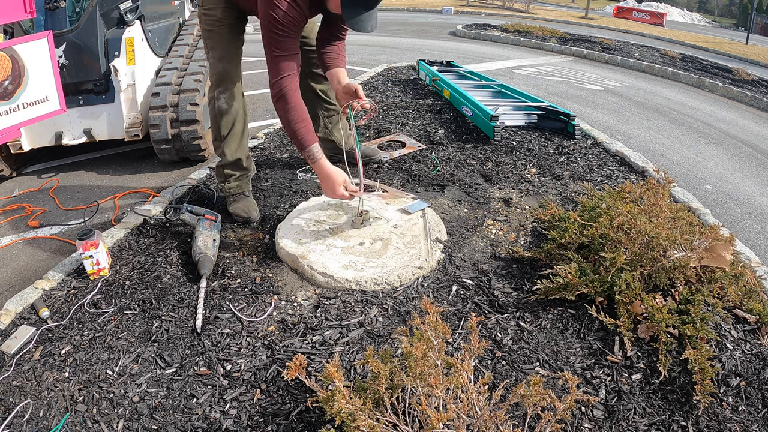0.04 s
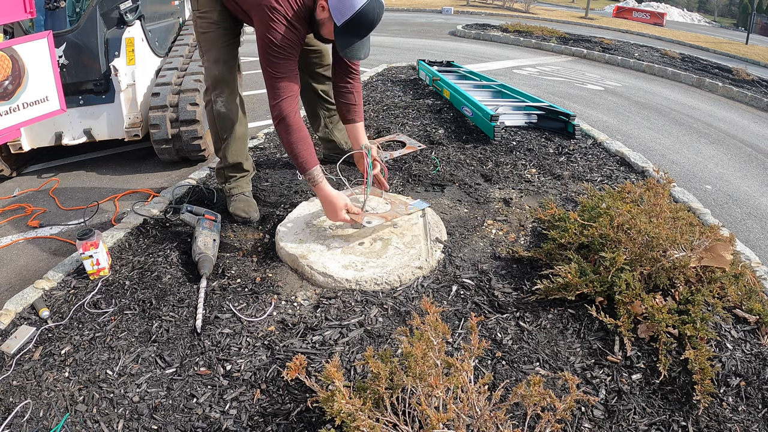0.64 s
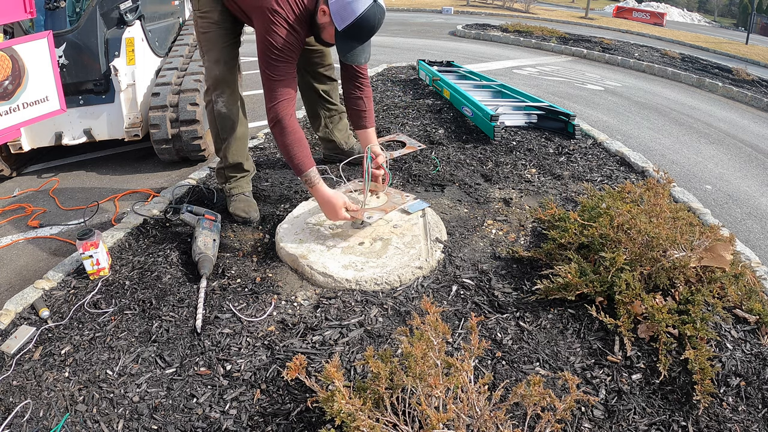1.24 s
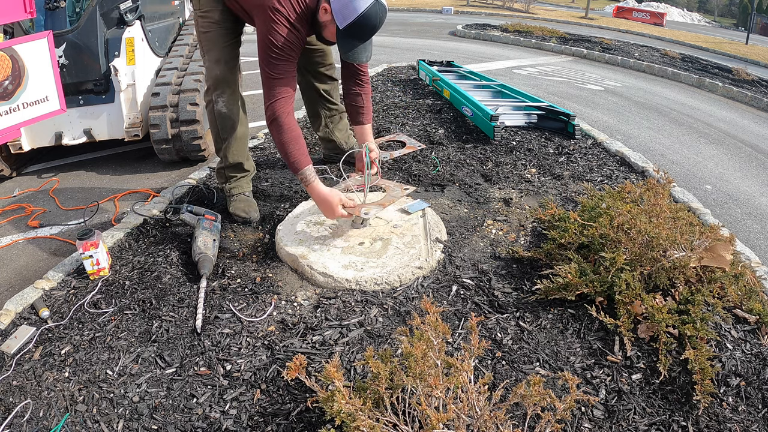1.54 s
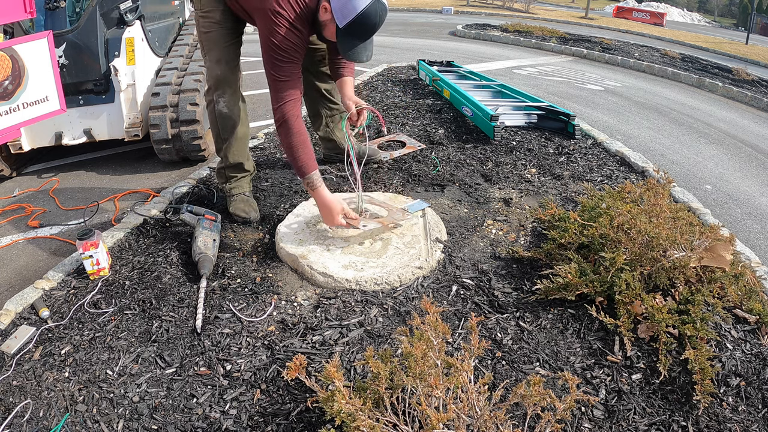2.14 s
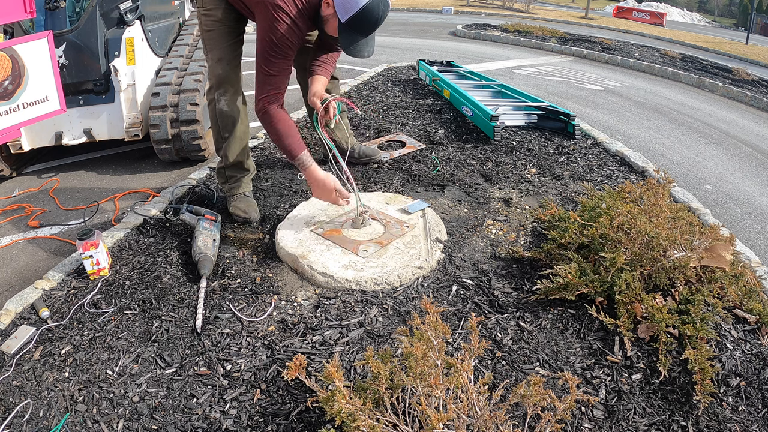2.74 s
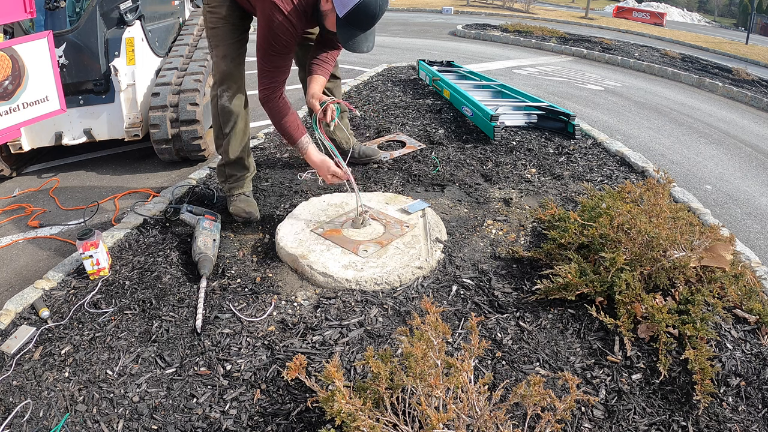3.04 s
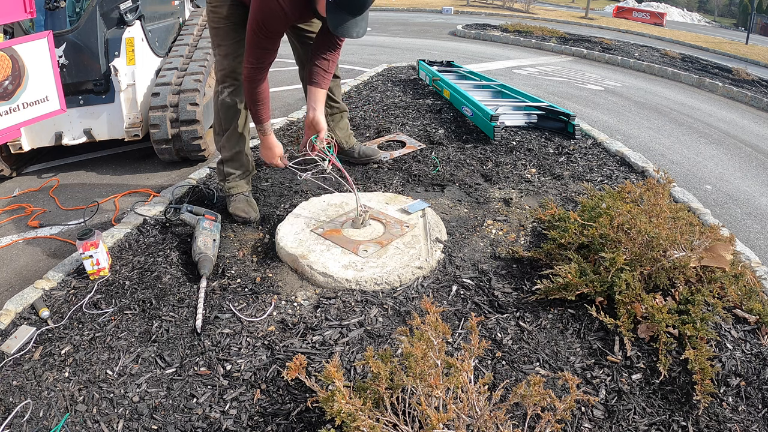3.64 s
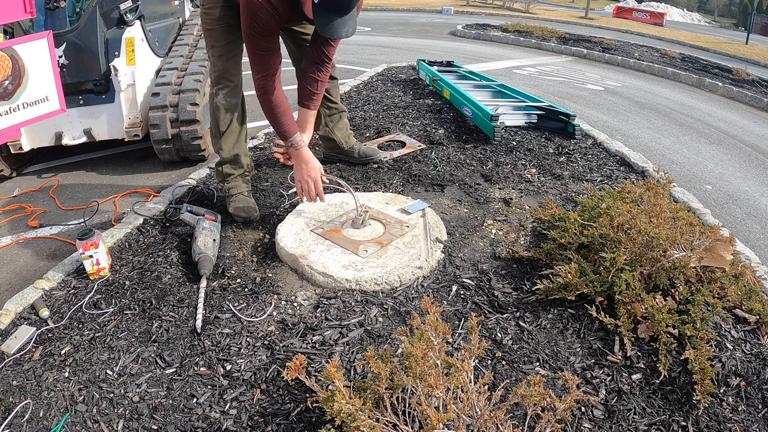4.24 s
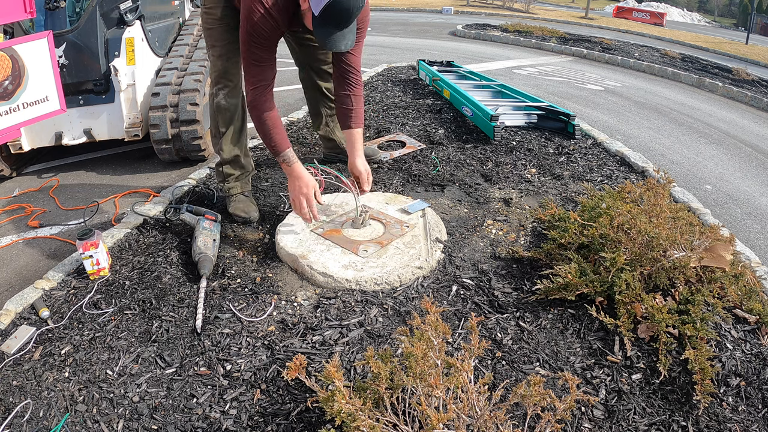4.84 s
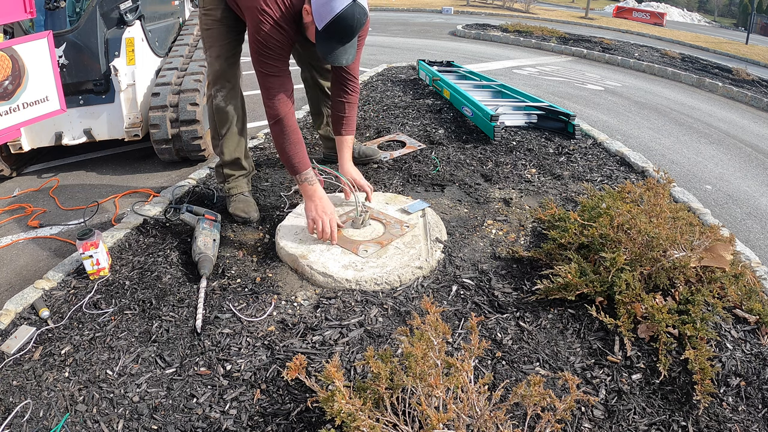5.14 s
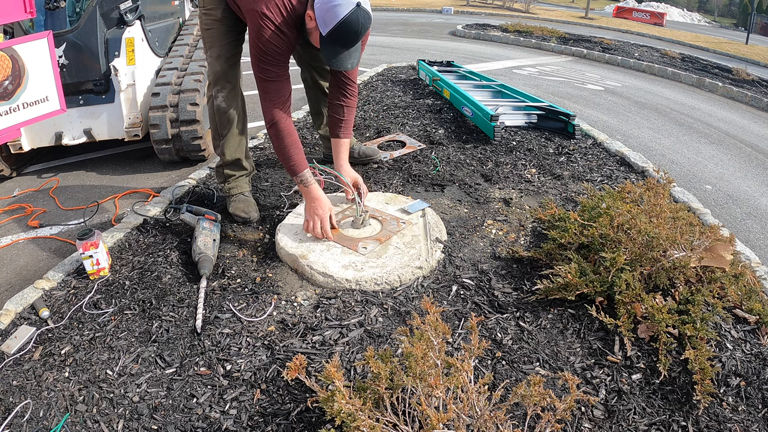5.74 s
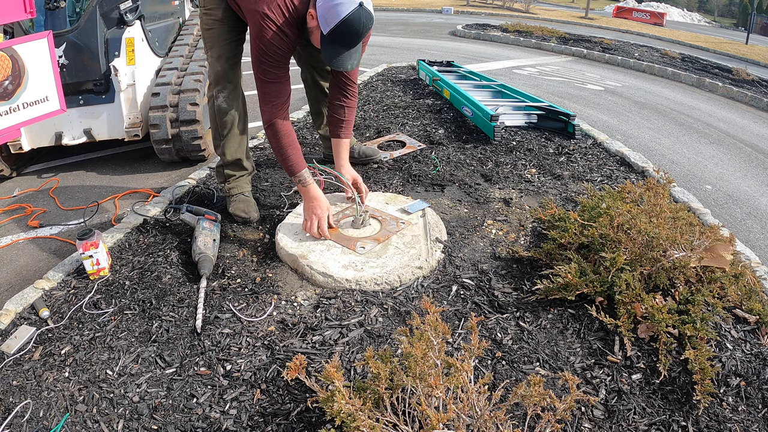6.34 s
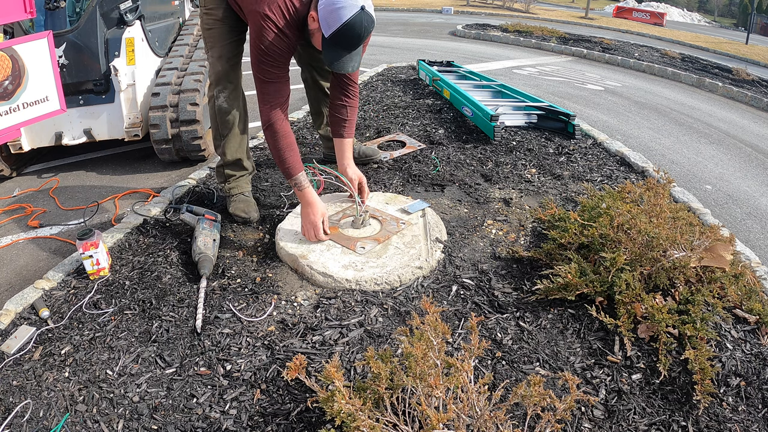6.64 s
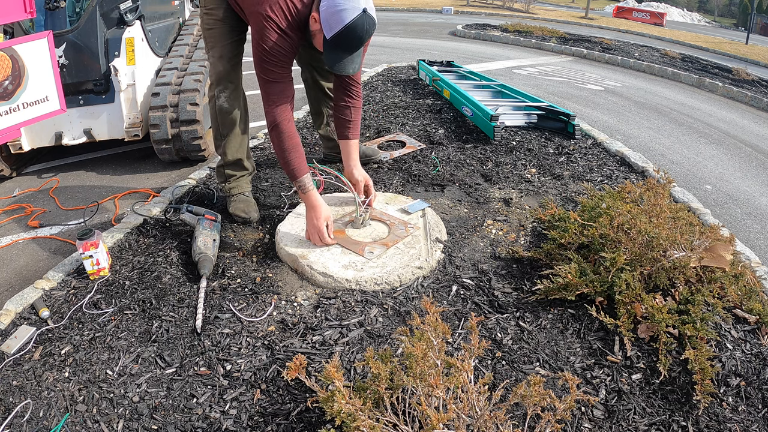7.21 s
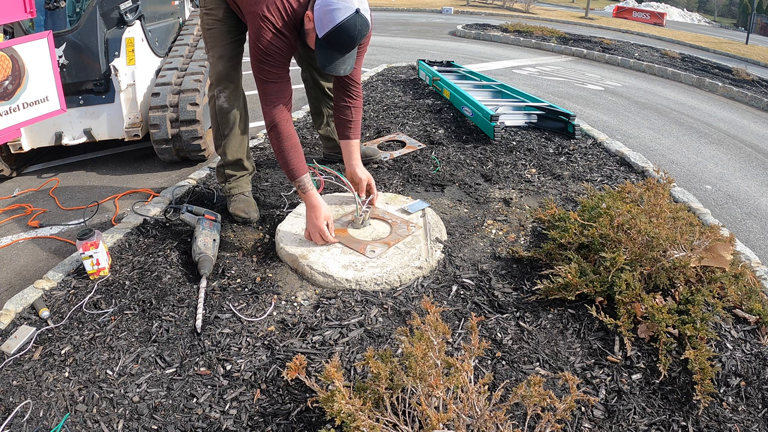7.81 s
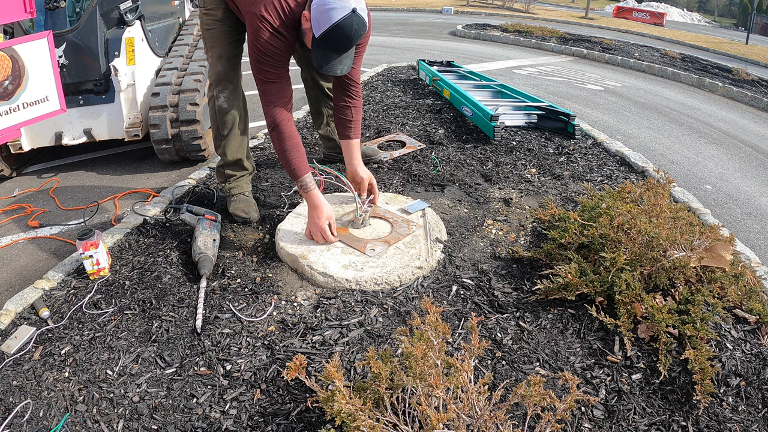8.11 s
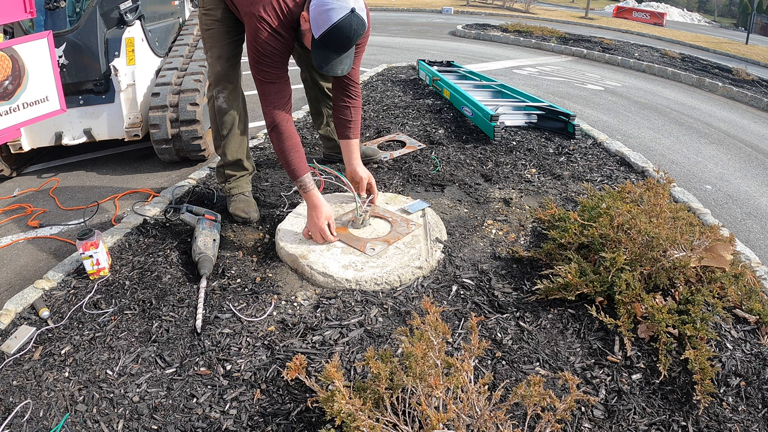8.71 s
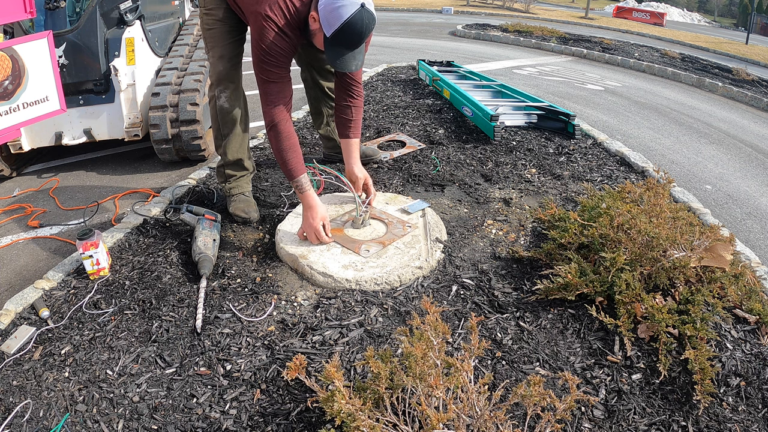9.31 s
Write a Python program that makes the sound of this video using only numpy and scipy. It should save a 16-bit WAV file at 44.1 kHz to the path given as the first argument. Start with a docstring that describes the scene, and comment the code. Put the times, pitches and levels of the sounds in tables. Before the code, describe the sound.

A diesel loader idles steadily outdoors. After a faint metallic tap, a steel plate clanks onto a concrete footing and is twisted, giving a loud, gritty, ringing grind. Wind thumps briefly on the microphone just afterwards. Later come scattered short, light scrapes and small clinks as the plate is nudged into place, with the engine running throughout.

```python
"""Steel plate twisted on concrete

A square steel anchor plate is dropped over a bolt and twisted round on a concrete footing: it clanks,
grinds as sand grains kick its modes, and rings out. Later, short light scrapes nudge it into line.
A tracked loader idles beside it, outdoors, and wind thumps softly on the camera's microphone,
whose gain control ducks the engine under the loud grinding."""
import sys
import numpy as np
from scipy import signal
from scipy.fft import rfft, irfft, next_fast_len
from scipy.io import wavfile
from scipy.ndimage import map_coordinates

SR = 44100
rng = np.random.default_rng(int(sys.argv[2]) if len(sys.argv) > 2 else 0)


def waveform_to_disk(signal):
    """Save audio, clipped to [-1, 1], as 16-bit WAV at the path in sys.argv[1]."""
    frames = np.transpose(np.atleast_2d(signal))
    scaled = np.clip(frames, -1, 1) * 32767
    samples = np.round(scaled).astype(np.int16)
    wavfile.write(sys.argv[1], SR, samples)


N = 417627
T = np.arange(N) / SR


def amp(db):
    """Decibels to gain."""
    return 10 ** (np.asarray(db) / 20)

def unit(x):
    """Scale to rms 1."""
    return x / np.sqrt(np.mean(x ** 2) + 1e-20)

def colour(points, hz):
    """Gain of an EQ curve through (Hz, dB) points on a log axis."""
    f, db = np.transpose(points)
    return amp(np.interp(np.log(hz + 1), np.log(f), db))

def filtered(x, response):
    """Filter x by a gain that is a function of frequency."""
    size = next_fast_len(x.shape[-1] + SR // 2)
    return irfft(rfft(x, size) * response(np.fft.rfftfreq(size, 1 / SR)), size)[..., :x.shape[-1]]

def noise(spectrum):
    """Coloured noise of rms 1."""
    return unit(filtered(rng.standard_normal(N), lambda hz: colour(spectrum, hz)))

def wobble(rate):
    """A smooth random curve, rate knots a second."""
    knots = rng.standard_normal(int(N * rate / SR) + 4)
    return np.interp(T, T[::20], map_coordinates(knots, [T[::20] * rate]))

def ramp(start, length):
    """Rises evenly from 0 to 1."""
    return np.clip((T - start) / length, 0, 1)

def swells(rows):
    """Bell-shaped envelopes of (centre s, dB, half length s), added in power."""
    powers = (amp(db) ** 2 * np.exp(-np.minimum(((T - s) / half) ** 2, 60)) for s, db, half in rows)
    return np.sqrt(sum(powers))

def tilted(x, tilt_db):
    """Brighten or dull by tilt_db per octave between 1 and 9 kHz."""
    return filtered(x, lambda hz: amp(tilt_db * np.log2(np.clip(hz, 1000, 9000) / 3500)))


# The plate's voice. Each row: pitch in Hz, width in Hz before damping scales it, relative level in dB.
PLATE_MODES = [(1745, 50, -10), (1920, 24, -13), (2182, 28, -3), (2307, 22, -8), (2398, 22, -6.5),
               (2533, 22, -9), (2704, 22, 2.5), (2868, 18, -6), (2900, 18, -8), (3105, 18, -1),
               (3420, 26, -6), (3505, 21, -2), (3625, 24, -1), (3823, 28, -.5), (3956, 16, -4),
               (4170, 24, -11), (4492, 26, -3), (4680, 49, -8), (5310, 50, -8), (5520, 40, -12),
               (5680, 36, -13), (5812, 40, -7), (6140, 50, -15), (6550, 50, -13), (6730, 41, -12),
               (6942, 30, -11), (7690, 41, -11), (8050, 36, -16), (8360, 51, -18), (9340, 40, -23)]
# The rasp of the rubbing faces between those modes. Each row: frequency in Hz, relative level in dB.
RASP_EQ = [(600, -60), (1400, -2), (1750, -10.5), (2300, -0.5), (3800, -3), (4300, -6.5), (5000, -19),
           (5500, -8), (6900, -13), (7200, -17), (8100, -18), (11000, -24.5), (13500, -25), (15500, -42)]

def plate_ring(damping, bed_db, bed_t60, crack_db, crack_t60, vary_db):
    """The plate's answer to one grain: main modes, a bed of weak ones and a dry crack; energy 1."""
    t = np.arange(SR // 2) / SR
    # each place of contact excites the modes with its own signs and strengths
    signs = rng.choice([-1, 1], len(PLATE_MODES))
    sizes = signs * amp(vary_db * rng.standard_normal(len(PLATE_MODES)))
    modes = sum(size * amp(db) * width * np.exp(-np.pi * damping * width * t) * np.sin(2 * np.pi * hz * t)
                for size, (hz, width, db) in zip(sizes, PLATE_MODES))
    bursts = rng.standard_normal((2, len(t))) * amp(-60 * t / [[bed_t60], [crack_t60]])
    bed, crack = filtered(bursts, lambda hz: colour(RASP_EQ, hz))
    ring = unit(modes) + amp(bed_db) * unit(bed) + amp(crack_db) * unit(crack)
    # a small plate radiates almost no bass
    ring = signal.sosfilt(signal.butter(9, 1650, 'high', fs=SR, output='sos'), ring)
    return ring / np.linalg.norm(ring)

def grit(size, rate, size_db):
    """Sand grains catch and break under the steel: random kicks, a few of them large."""
    kicks = (rng.random(size) < rate / SR) * rng.choice([-1, 1], size)
    return unit(kicks * amp(size_db * np.minimum(rng.exponential(size=size), 4)))


# The grinding turns. Each row: start and fastest moment in seconds, level in dB, half length in seconds.
PLATE_TURNS = [(2.411, 2.45, -27.5, 0.081), (2.554, 2.725, -16.2, .183), (3.04, 3.067, -40, 0.043)]

def twist(break_loose_s=.005, first_slip_s=2.64, slip_gap_s=.053, dull_above_hz=6600, bite_db=-9):
    """Turned under weight, the plate grinds and rings; coarse grains bite at speed, so slow is dull."""
    speed = sum(ramp(start, break_loose_s) * swells([(fastest, db, half)])
                for start, fastest, db, half in PLATE_TURNS)
    # at full pressure it catches and slips three times, each slip weaker
    slips = swells([(first_slip_s + k * slip_gap_s, -9.5 - k, .011) for k in range(3)])
    drive = speed * (1 + slips)
    ring = plate_ring(damping=.64, bed_db=-8.5, bed_t60=.2, crack_db=-7, crack_t60=.015, vary_db=.5)
    fine = filtered(grit(N, rate=2800, size_db=3.5), lambda hz: 1 / np.hypot(1, (hz / dull_above_hz) ** 2))
    coarse = tilted(grit(N, rate=350, size_db=2), tilt_db=6.5) * np.sqrt(drive / drive.max())
    force = drive * amp(1.05 * wobble(70)) * (fine + amp(bite_db) * coarse)
    return signal.fftconvolve(force, ring)[:N]


# Steel clanks on concrete. Each row: start in seconds, attack level in dB, choke time (t60) in seconds,
# tilt in dB per octave, fall from edge to face in seconds.
PLATE_KNOCKS = [(0.9236, -38.5, .09, 3.5, .0015), (2.3595, -26, 0.44, 0, 0.0049),
                (2.553, -18, 0.16, 0.5, 0.0045), (6.9422, -33, 0.3, -2.5, 0.0026),
                (8.448, -40, .13, -2, .003), (8.502, -42.5, .1, 1, 0.0022)]

def knocks(crush_t60=.023, edge_db=-.5, edge_tilt_db=-2):
    """A softer, duller edge hit, then the face: each crushes grit and rings until concrete chokes it."""
    out, t = np.zeros(N + SR), np.arange(SR // 2) / SR
    for start, db, t60, tilt_db, fall_s in PLATE_KNOCKS:
        edge = (start, db + edge_db, tilt_db + edge_tilt_db)
        face = (start + fall_s, db, tilt_db)
        for at, hit_db, hit_tilt_db in (edge, face):
            force = rng.standard_normal(len(t)) * amp(-60 * t / crush_t60)
            ring = plate_ring(damping=.16, bed_db=3, bed_t60=.2, crack_db=0, crack_t60=.0062, vary_db=2)
            choked = ring * amp(-60 * t / t60)
            clank = tilted(signal.fftconvolve(force, choked)[:len(t)], hit_tilt_db)
            attack_rms = np.std(clank[:SR // 200])
            out[round(at * SR):][:len(t)] += amp(hit_db) * clank / attack_rms
    return out[:N]


# Small scrapes. Each row: centre in seconds, gain in dB, half length in seconds, tilt in dB per octave.
PLATE_NUDGES = [(1.318, -51, .02, -4.5), (5.507, -44, 0.047, 2), (5.668, -46, 0.016, 0),
                (5.876, -46, .014, -1.5), (5.919, -43, .012, 1.5), (6.884, -39, 0.029, -1),
                (6.961, -36.5, 0.035, -3), (7.08, -45, 0.0075, -5), (7.522, -46, .02, -3),
                (7.791, -49.5, .04, -2), (7.883, -34, 0.011, -1), (8.174, -47.5, .035, -3),
                (8.442, -40, .019, 0), (8.788, -35, .015, .5), (9.412, -52, .05, 4)]
# Dry sand under the plate. Each row: frequency in Hz, relative level in dB.
SAND_EQ = [(1200, -32), (2400, 8), (4500, 0.5), (9500, -33), (12200, -13.5), (15500, -35)]

def nudges(sand_db=-5, roundness=1.45):
    """Light pushes, with fingers damping the plate, so that the dry sand is heard too."""
    out, t = np.zeros(N + SR), np.arange(-SR // 8, SR // 8) / SR
    for centre, db, half, tilt_db in PLATE_NUDGES:
        force = grit(len(t), rate=2300, size_db=6) * np.exp(-.5 * np.abs(t / half) ** roundness)
        ring = plate_ring(damping=.85, bed_db=-5, bed_t60=.079, crack_db=-6, crack_t60=.011, vary_db=1.2)
        scrape = signal.fftconvolve(force, ring)
        sand = unit(filtered(force, lambda hz: colour(SAND_EQ, hz)))
        scrape[:len(t)] += amp(sand_db) * np.std(force) * sand
        out[round((centre + t[0]) * SR):][:len(scrape)] += amp(db) * tilted(scrape, tilt_db)
    return out[:N]


# Touches on the bolt. Each row: start in seconds, gain in dB.
BOLT_TOUCHES = [(.9245, -43.5), (5.9113, -44), (5.926, -46)]
# The partials of a tink. Each row: pitch in Hz, relative level in dB, ring time (t60) in seconds.
TINK_MODES = [(2869, -11, 0.28), (3828, -0.5, 0.3), (5310, -7, 0.24), (6040, -14, 0.27), (6460, -6, 0.18)]

def tinks(vary_db=.9):
    """The plate's edge touches the bolt and gives a brief bright ring."""
    out, t = np.zeros(N + SR), np.arange(SR // 2) / SR
    for start, db in BOLT_TOUCHES:
        ring = sum(amp(level + rng.normal(0, vary_db) - 60 * t / t60) * np.sin(2 * np.pi * hz * t)
                   for hz, level, t60 in TINK_MODES)
        out[round(start * SR):][:len(t)] += amp(db) * ring
    return out[:N]


# The exhaust note. Each row: multiple of the firing rate, relative level in dB.
EXHAUST_HARMONICS = [(1, -2.5), (2, -0.5), (3, -1.5), (4, -8), (5, 1), (6, -15.5), (7, -28), (8, -29.5),
                     (9, -23), (10, -5.5), (11, -39), (12, -21), (13, -28.5), (14, -24), (15, -19),
                     (16, -23), (17, -26.5), (18, -29), (19, -21), (20, -21.5), (21, -28), (22, -21.5),
                     (23, -13.5), (24, -21.5), (25, -28), (26, -21.5), (27, -28), (28, -25), (29, -46),
                     (30, -19), (31, -29.5), (32, -18), (33, -45), (34, -31), (35, -23), (36, -46),
                     (37, -31), (38, -46), (39, -31), (40, -24)]
# Engine clatter and fan hiss. Each row: frequency in Hz, relative level in dB.
CLATTER_EQ = [(25, 3.5), (65, 4), (130, 4.5), (200, -5.5), (290, -4.5), (450, -12.5), (800, -11.5),
              (1000, -13), (1350, -11), (1560, -15.5), (1750, -13.5), (2300, -19.5), (3500, -23),
              (7000, -63.5)]
FAN_EQ = [(1500, -15), (2500, 5.5), (3600, 6.5), (4300, 1), (6400, -0.5), (7700, -5.5), (8500, -11.5),
          (10500, -17.5), (12500, -22), (15500, -42)]
# Engine bay panels that sing along. Each row: pitch in Hz, width in Hz, relative level in dB.
PANEL_MODES = [(297.5, 3.3, -1), (794.4, 21, -12.5), (1370, 14, -12.5), (1744, 59, -14.5),
               (2039, 16, -12.5)]

def loader(firing_hz=35, hunt_hz=.0499, flutter_db=.34, swell_from_s=4.6):
    """A diesel idles: exhaust harmonics, singing panels, and clatter and fan hiss that throb with it."""
    def panel_response(f):
        return sum(amp(db) * hz * width / (hz * hz - f * f + 1j * f * width)
                   for hz, width, db in PANEL_MODES)
    angle = 2 * np.pi * np.cumsum(firing_hz + hunt_hz * wobble(7)) / SR
    exhaust = sum(amp(db + flutter_db * wobble(11)) * np.cos(k * angle + rng.uniform(0, 2 * np.pi))
                  for k, db in EXHAUST_HARMONICS)
    # injectors and valves strike at several places in each two-firing cycle
    throb = unit(sum(np.cos(k * angle / 2 + rng.uniform(0, 2 * np.pi)) for k in (1, 2, 4, 8)))
    clatter = noise(CLATTER_EQ) * amp(.67 * throb)
    panels = filtered(rng.standard_normal(N), panel_response)
    fan = noise(FAN_EQ) * amp(.74 * throb)
    # the loader slowly grows louder, its treble most
    swell_s = np.maximum(T - swell_from_s, 0)
    layers = [(exhaust, -30.5, .27), (clatter, -36, .55), (panels, -47.5, .55), (fan, -56, 1)]
    return sum(unit(layer) * amp(db + db_per_s * swell_s) for layer, db, db_per_s in layers)


# Wind rumble, and the crisper thump of a hard buffet. Each row: frequency in Hz, relative level in dB.
RUMBLE_EQ = [(15, -4), (35, 2), (80, 0.5), (130, -13), (250, -14.5), (600, -45), (1500, -90)]
THUMP_EQ = [(40, -31), (100, -7), (180, 10.5), (300, -9.5), (500, -8.5), (1200, -50), (3000, -100)]
# Slow gusts. Each row: centre in seconds, level in dB, half length in seconds.
WIND_GUSTS = [(1.08, -32.5, 0.1), (3.1, -24, 0.056), (6.3, -34, 0.23), (7.5, -37, .25)]
# Sudden buffets. Each row: centre in seconds, level in dB.
WIND_BUFFETS = [(.96, -30), (1.18, -42), (3.001, -15.5), (3.04, -17), (3.11, -22.5), (6.37, -24),
                (7.32, -26), (7.62, -34)]

def wind(breeze_db=-46.5, buffet_half_s=.017, crisp_db=-7):
    """Air on the microphone: a lumpy breeze, slow gusts and buffets; the hardest ones reach higher."""
    lumpy = unit(noise(RUMBLE_EQ) * amp(2 * wobble(12)))
    rumble = lumpy * np.hypot(amp(breeze_db), swells(WIND_GUSTS))
    buffets = swells([(centre, db, buffet_half_s) for centre, db in WIND_BUFFETS])
    crispness = amp(crisp_db) * buffets / buffets.max()
    return rumble + buffets * (noise(RUMBLE_EQ) + crispness * noise(THUMP_EQ))


# The yard's reverb. Each row: frequency in Hz, decay time (t60) in seconds.
YARD_DECAY = [(1500, 1), (3000, 0.47), (6000, 0.12), (12000, 0.26)]

def yard(x):
    """Pavement and machine return a tail whose treble dies first."""
    hz, t, spectra = signal.stft(rng.standard_normal(SR), SR, nperseg=256)
    t60 = np.interp(hz, *np.transpose(YARD_DECAY))[:, None]
    tail = signal.istft(spectra * amp(-60 * t / t60), SR, nperseg=256)[1]
    return signal.fftconvolve(x, tail / np.linalg.norm(tail))[:N]


# Stereo width: the fully open image, and the airy top that is always wide.
# Each row: frequency in Hz, side level against mid in dB.
OPEN_WIDTH = [(30, -22), (100, -22), (300, -14), (700, -8.5), (3000, -9.5), (10000, -8.5)]
AIRY_WIDTH = [(3000, -87), (10500, -47), (12000, 1), (15000, 2)]

def spread(x, opening, lean_db=1.5, airy_lead_rad=1.96):
    """Mono to stereo: the image widens and leans left as it opens; the airy top favours the right."""
    knots = np.arange(0, SR / 2, 60)
    # the side signal leads in the bass and its phase wanders above 1200 Hz
    phase = np.pi / 2 + np.cumsum(rng.standard_normal(len(knots)) * (knots > 1200))
    wide = filtered(x, lambda hz: colour(OPEN_WIDTH, hz) * np.exp(1j * np.interp(hz, knots, phase)))
    airy = filtered(x, lambda hz: colour(AIRY_WIDTH, hz) * np.exp(1j * airy_lead_rad))
    side = opening * wide + airy
    return np.array([x + side, x - side]) * amp(np.outer([.5, -.5], lean_db * opening))

def scene(yard_db=-15.5, side_wind_db=-9):
    """Plate, loader and wind, nearly straight ahead, in an image that starts narrow and opens out."""
    opening = ramp(start=5.54, length=2.16)
    plate = twist() + nudges() + knocks() + tinks()
    side_wind = amp(side_wind_db) * opening * wind()
    mid = loader() + plate + amp(yard_db) * yard(plate) + wind()
    return spread(mid, opening) + np.outer([1, -1], side_wind)

def record(dry, threshold_db=-25.5, slope=.32, hold_s=.014, recover_s=.7, linger=.27, top_hz=15400):
    """The camera ducks loud sound, regains the last of its gain slowly and cuts all above top_hz."""
    def follow(x, seconds):
        """A running mean that forgets over the given time."""
        keep = np.exp(-1 / (seconds * SR))
        return signal.lfilter([1 - keep], [1, -keep], x)
    level_db = 10 * np.log10(follow(np.mean(dry ** 2, axis=0), hold_s) + 1e-12)
    over_db = np.maximum(level_db - threshold_db, 0)
    duck_db = slope * over_db + linger * follow(over_db, recover_s)
    return filtered(dry * amp(-duck_db), lambda hz: hz < top_hz)


dry = scene()
out = record(dry)
waveform_to_disk(out)
```